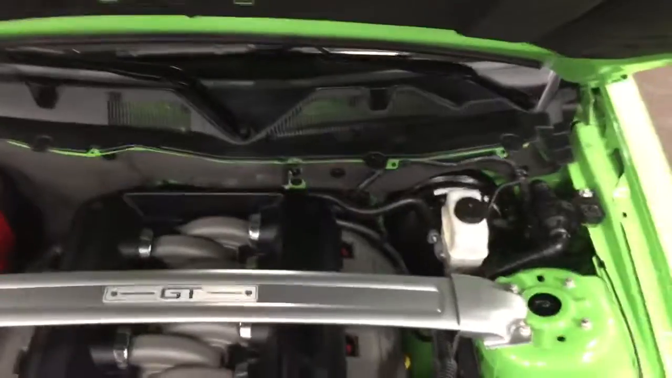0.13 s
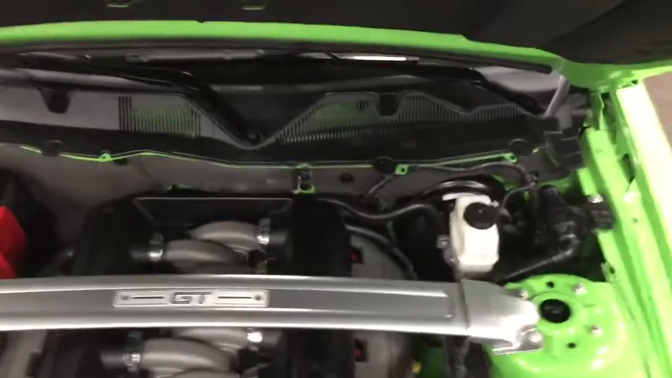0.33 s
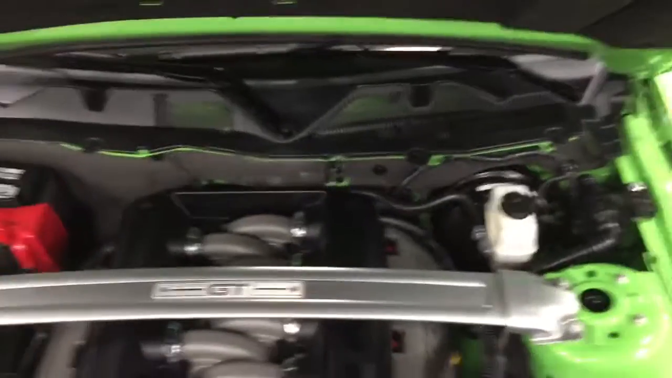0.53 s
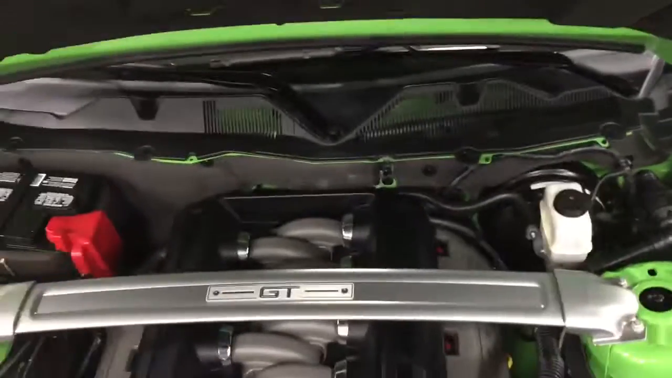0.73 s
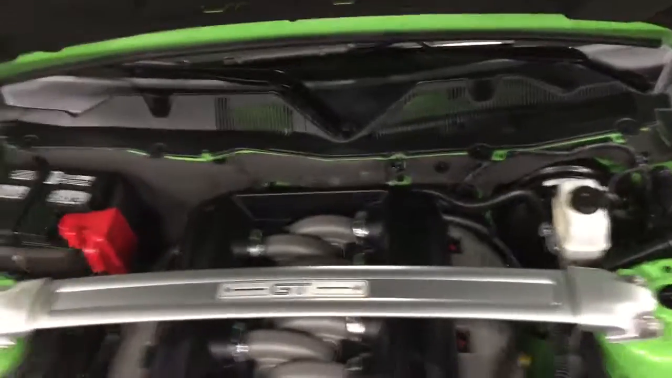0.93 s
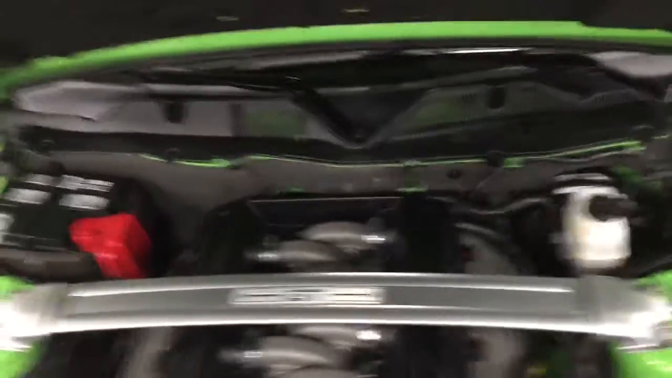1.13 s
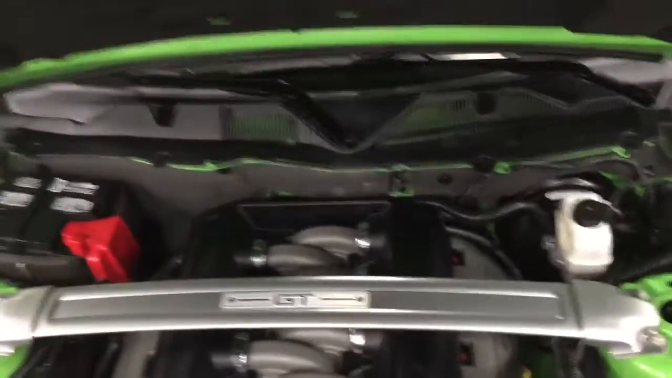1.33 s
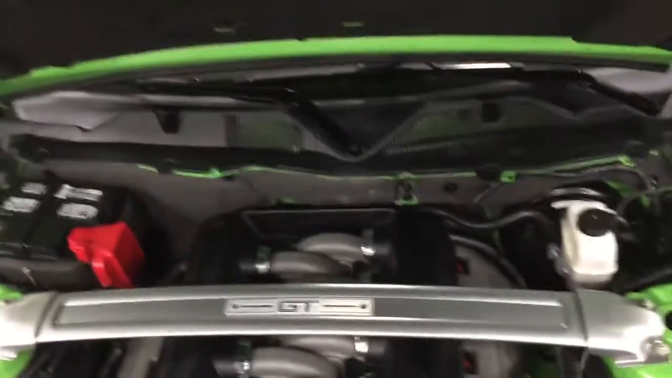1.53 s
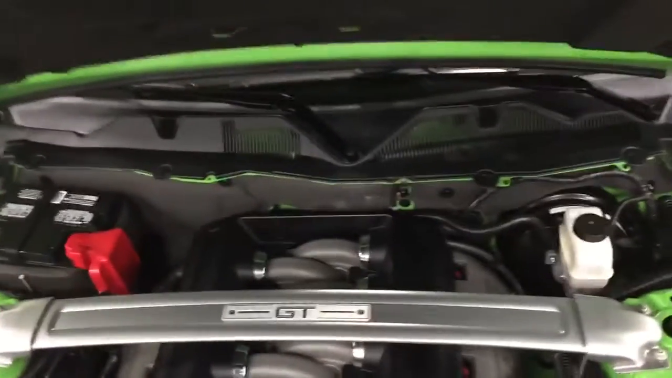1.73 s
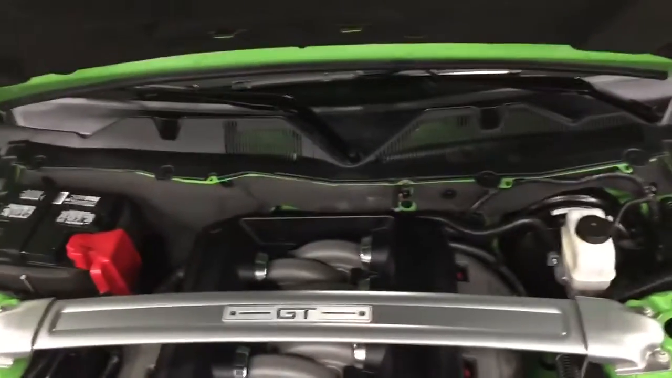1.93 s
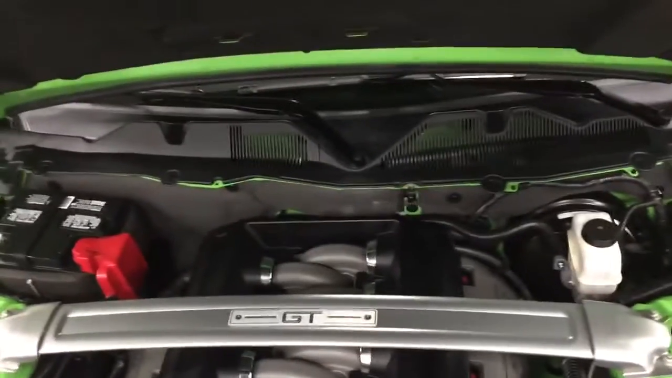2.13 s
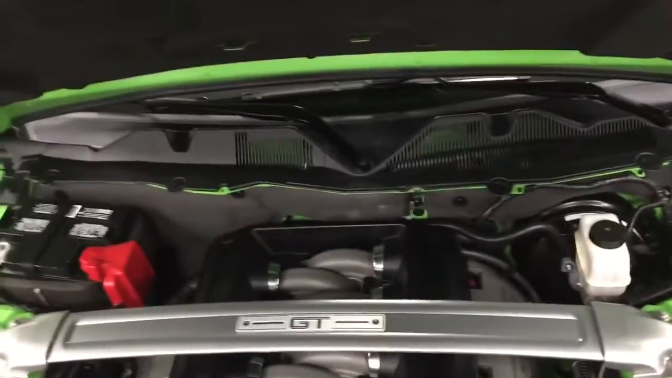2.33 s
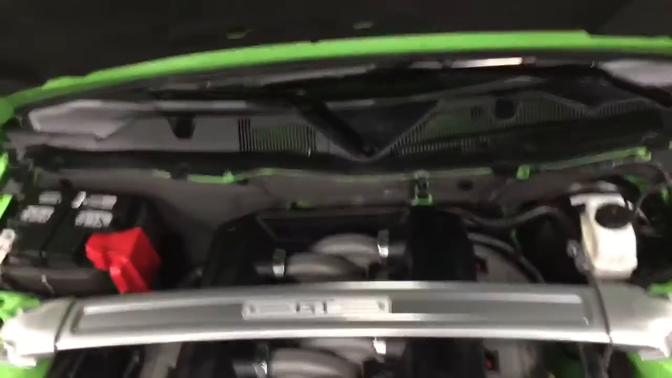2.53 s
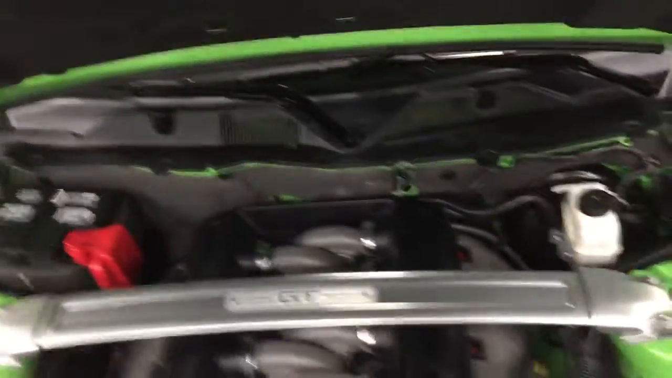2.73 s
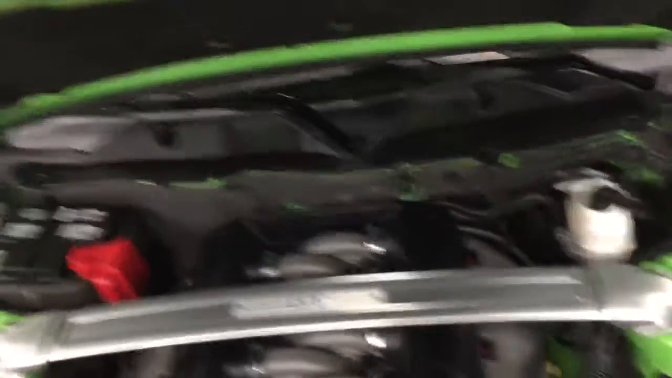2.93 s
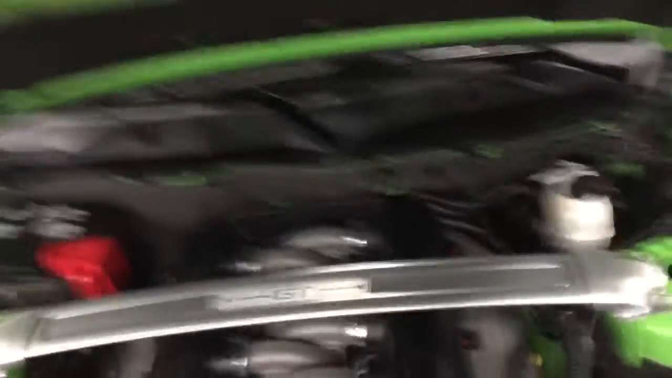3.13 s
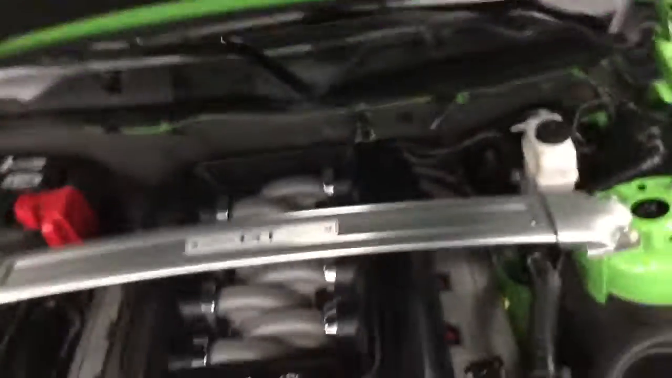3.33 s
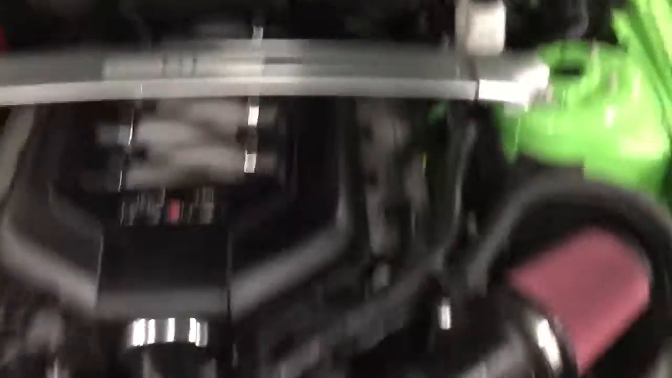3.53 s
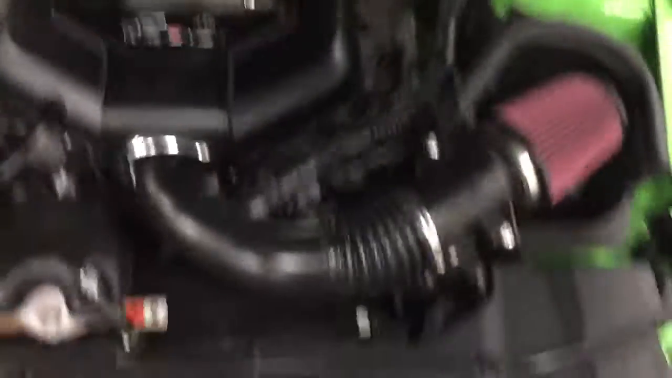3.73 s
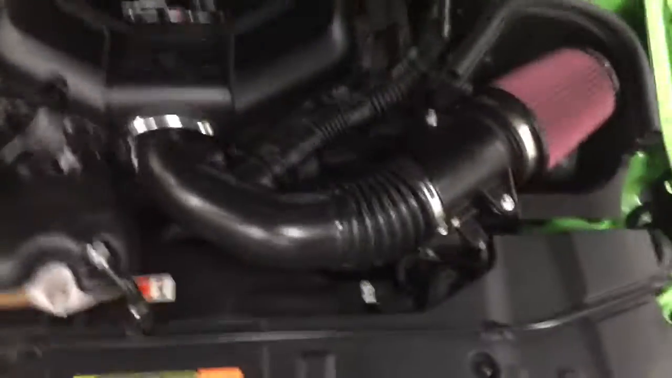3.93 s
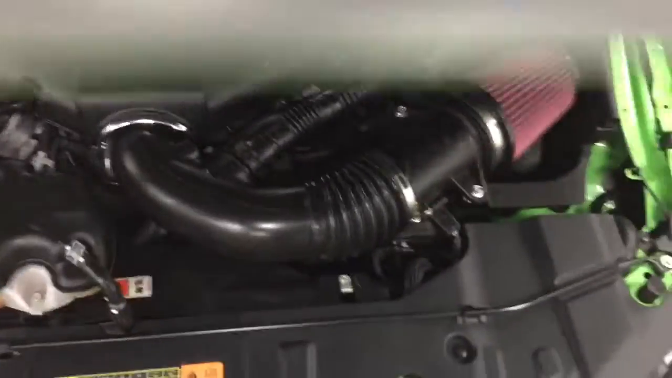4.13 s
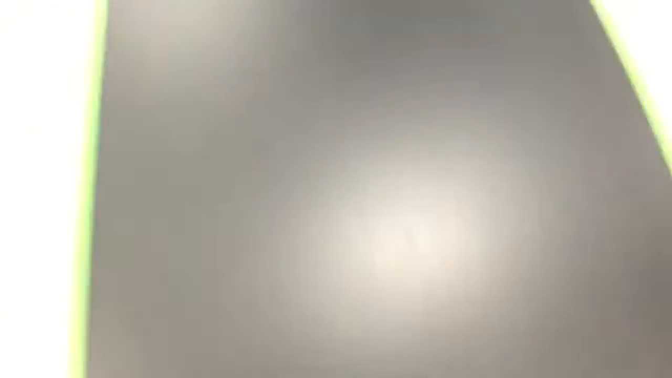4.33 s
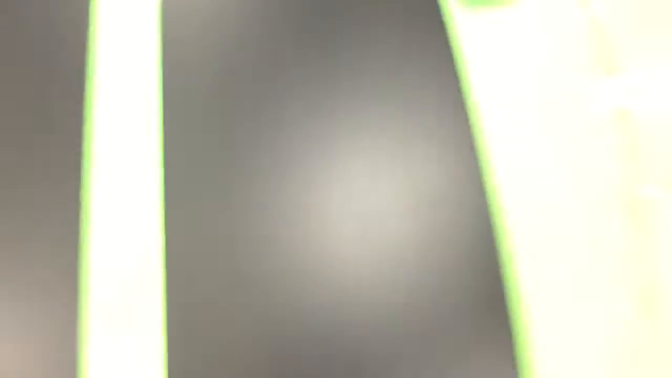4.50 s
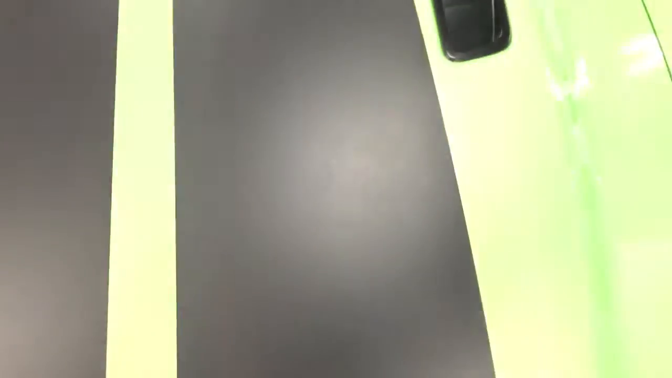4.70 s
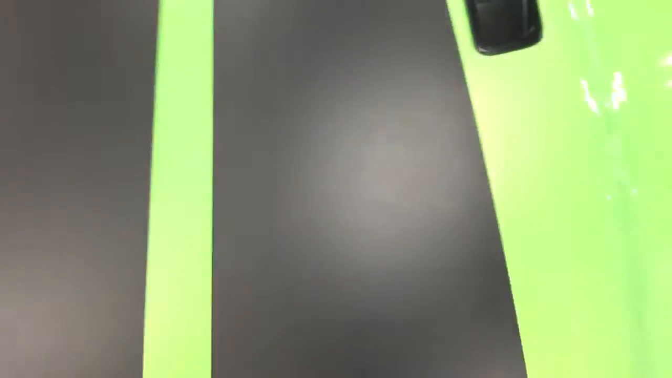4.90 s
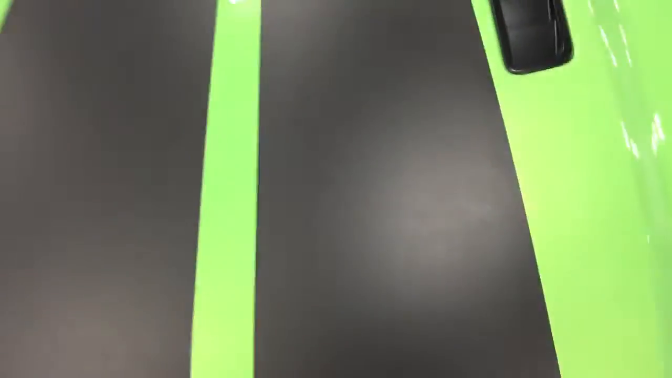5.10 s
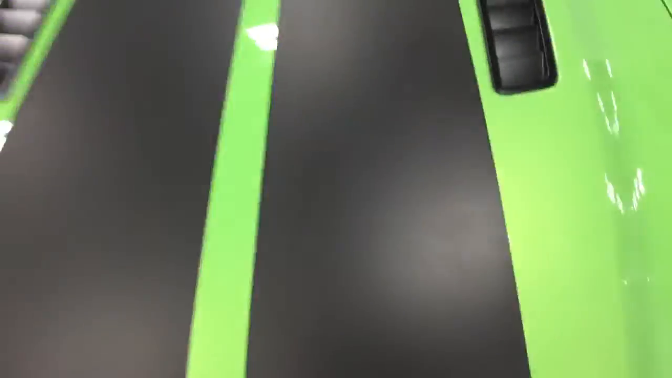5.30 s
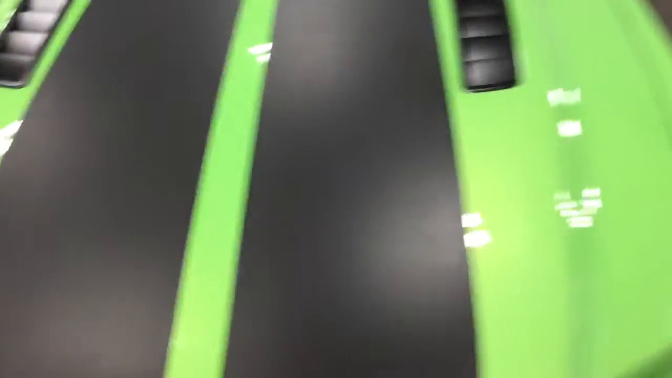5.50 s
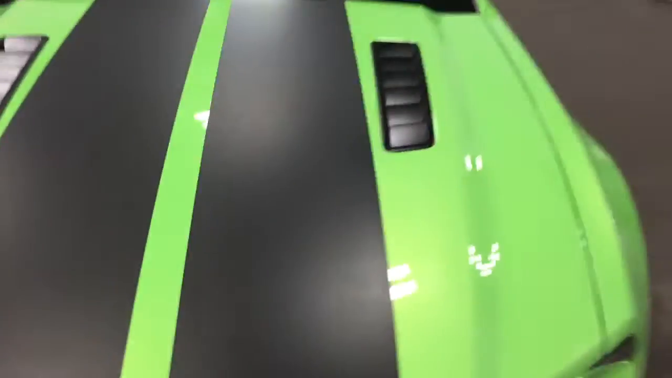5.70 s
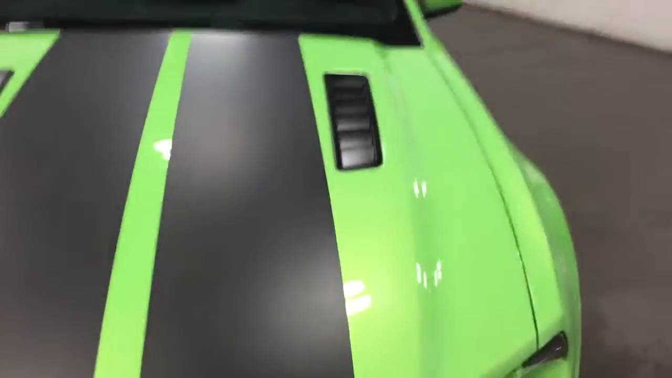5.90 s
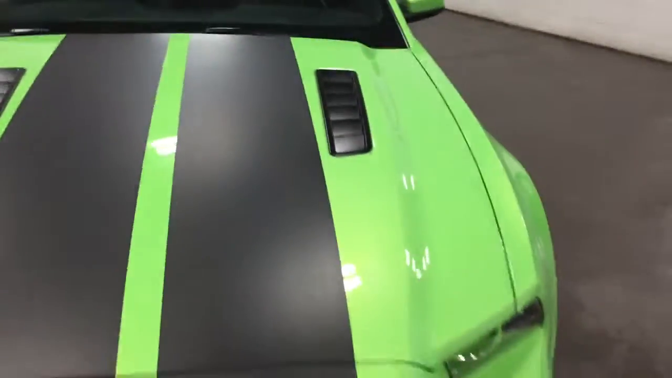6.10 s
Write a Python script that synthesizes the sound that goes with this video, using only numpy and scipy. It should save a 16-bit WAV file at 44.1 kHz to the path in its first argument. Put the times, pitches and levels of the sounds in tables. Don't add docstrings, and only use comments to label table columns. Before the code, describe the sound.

Irregular metallic clacks and small creaks under a car hood, a quieter lowering, then one heavy overloaded slam ringing briefly in a large hall.

```python
import sys
import numpy as np
from scipy import signal
from scipy.fft import rfft, irfft
from scipy.io import wavfile
from scipy.ndimage import uniform_filter1d

SR = 44100
rng = np.random.default_rng(int(sys.argv[2]) if len(sys.argv) > 2 else 0)


def master(y):
    cut = np.clip(np.atleast_2d(y).T, -1, 1)
    pcm = np.round(cut * 32767)
    wavfile.write(sys.argv[1], SR, pcm.astype(np.int16))


def volts(x):
    e = np.asarray(x, float) / 20
    return 10 ** e


N = 275757

# f/Hz, density/dB
HALL_AIR = [(18, -29.5), (30, -2.5), (230, -3.5), (437, -18), (1190, -16), (2980, -25), (14800, -37.5),
            (16000, -53.5)]
# f/Hz, width/Hz, level/dB
HUM_MODES = [(119, 5.9, -0.5), (168, 14, 2), (187, 7.8, -6), (253.3, 6.8, -3), (310, 12, -8.5),
             (325, 16, -15.5)]
# t/s, effort/dB
EFFORT = [(0, -28.5), (.23, -47), (.58, -61), (.65, -45.5), (.97, -57.5), (1.32, -50), (1.8, -40.5),
          (1.98, -53), (2.22, -33.5), (2.35, -42), (3.03, -59.5), (3.57, -46), (3.93, -50.5), (4.4, -62.5),
          (4.62, -50), (4.76, -29.5), (5.25, -65), (6.25, -66)]
# t/s, level/dB, t60/s
LURCHES = [
    (.08, -21.5, 0.13),
    (.47, -44, 0.24),
    (.66, -47, 0.56),
    (1.73, -30, 0.43),
    (2.92, -48, 0.27),
    (3.17, -44.5, 0.26),
    (4.64, -15.5, 0.65),
    (5.97, -49, 0.66),
]
# f/Hz, t60/s, level/dB
HALL_TAIL = [(200, .85, -18), (400, 0.32, -11), (710, .6, -5), (1500, 0.94, -6.5), (2800, 1.25, -4),
             (5500, 1.1, -6), (8500, 0.62, -2.5), (14000, 0.4, -4)]

# f/Hz, width/Hz, level/dB
PANEL_MODES = [(418, 20, -3.5), (577, 48, 4), (699, 140, 3), (810, 62, -2.5), (947, 240, 3.5),
               (1128, 45, 2.5), (1188, 33, -0.5), (1340, 46, -10)]
# f/Hz, width/Hz, level/dB
ROD_MODES = [(1530, 300, -2), (1730, 170, 2), (1896, 140, -0.5), (2046, 84, 3.5), (2257, 110, 1),
             (2420, 40, -4.5)]
# f/Hz, width/Hz, level/dB
BOOM_MODES = [(130, 36, 2), (186, 75, -6), (211.6, 8.3, 4), (242.6, 25, -0.5), (370, 27, -4)]

# t/s, length/s, panel level/dB, rod level/dB, fizz level/dB
CREAKS = [
    (.164, .065, -40, -41.5, -51),
    (0.618, .22, -50, -55.5, -86),
    (3.64, .038, -46, -44, -84),
    (3.756, .074, -50.5, -48, -73),
    (3.864, .037, -54.5, -59, -79),
]
# t/s, length/s, panel level/dB, rod level/dB, fizz level/dB
RUBS = [(0, .047, -36, -37.5, -46), (1.253, .19, -44, -53.5, -78), (1.357, .11, -46, -49, -76),
        (1.694, .05, -46, -52, -67), (2.083, .06, -31, -46, -68), (2.18, .079, -34.5, -44, -67),
        (2.404, .034, -34, -41.5, -53), (3.185, .055, -53.5, -60, -60), (3.265, .077, -46, -43, -61.5),
        (3.375, .11, -46, -44, -70), (3.478, .12, -56, -55.5, -73), (4.002, 0.15, -56, -62, -88.5),
        (4.411, .05, -53, -72.5, -94.5), (4.499, .11, -65, -78, -88), (4.594, .012, -44, -45.5, -58),
        (4.607, .01, -38.5, -29, -55)]
# t/s, clack level/dB, tick level/dB, f/Hz, t60/s
SNAPS = [(.1612, -27.5, -55, 3900, .14), (.252, -48, -95, 3780, 0.028), (.383, -37, -46, 7100, 0.012),
         (1.582, -40.5, -59.5, 3830, .022), (1.7084, -41, -64, 4030, 0.17), (1.7449, -9, -20.5, 4240, .036),
         (1.761, -13.5, -50.5, 2930, 0.024), (3.1712, -26.5, -36.5, 5340, .02),
         (3.2158, -31.5, -67, 4530, 0.022), (3.2372, -32.5, -51, 5270, 0.019),
         (4.6311, -7, -22.5, 5700, .05), (4.6386, -9, -19, 5300, .04), (4.6451, -6, -20.5, 5500, .025),
         (6.1486, -58.5, -59.5, 3290, .044), (6.1738, -59, -74, 3270, .045)]
# t/s, strength/dB, hardness/dB, t60/s
PANEL_KNOCKS = [(.255, -34, -40, .046), (.384, -25, -34, 0.092), (.573, -47.5, -66, 0.14),
                (.822, -35.5, -45, .12), (.933, -38, -40, 0.054), (1.022, -46, -38, 0.15),
                (1.158, -22, -22.5, 0.088), (1.251, -35, -40, 0.046), (1.268, -28, -33, 0.041),
                (1.339, -14.5, -12, 0.15), (1.346, -10.5, -5, 0.15), (1.542, -19, -8.5, .19),
                (2.141, -17.5, -7, .086), (2.174, -11.5, -8, 0.26), (2.214, -4, -5, 0.13),
                (2.412, -22, -6.5, 0.12), (2.446, -7, -10, 0.18), (2.598, -18, -14.5, .19),
                (2.93, -32.5, -40, 0.11), (3.033, -48.5, -42.5, .11), (3.112, -42, -42.5, .19),
                (3.17, -29.5, -37, .043), (4.416, -41.5, -40, .22), (5.973, -49, -40.5, 0.18),
                (6.036, -47.5, -40, .16)]
# t/s, strength/dB, hardness/dB, t60/s
SOCKET_KNOCKS = [(.011, -25, -8, 0.37), (.074, -18.5, -9.5, 0.058), (.467, -29.5, -20, 0.089),
                 (.616, -30, -47, 0.14), (.71, -52, -40, .043), (.741, -39, -40, 0.19),
                 (1.04, -32, -20.5, 0.11), (1.074, -28.5, -25.5, 0.13), (1.47, -23, -16, 0.12),
                 (1.509, -18.5, -16, 0.11), (1.584, -31, -40, 0.039), (1.71, -31.5, -35, 0.41),
                 (1.744, 3, -39.5, 0.085), (1.775, -9.5, -3.5, 0.17), (2.075, -23.5, -11.5, 0.15),
                 (2.089, -16, -3.5, 0.39), (2.247, -10, -12.5, 0.19), (2.556, -26.5, -40, .31),
                 (2.718, -36.5, -43, 0.091), (2.828, -27.5, -40, .11), (3.594, -40, -41, 0.11),
                 (4.565, -32, -5.5, 0.15)]
# t/s, strength/dB, hardness/dB, t60/s
ROD_TAPS = [(.03, -19.5, -7, 0.27), (.163, -24.5, -24, 0.42), (.654, -37, -40, 0.18),
            (3.152, -34, -11, 0.11), (3.217, -43, -40, .2), (3.254, -24, -6.5, 0.029),
            (3.392, -27, -9, 0.24), (3.447, -32.5, -7.5, 0.11), (3.561, -17, -12, .13),
            (3.619, -43, -39, 0.056), (3.641, -44, -2, 0.24), (3.756, -38.5, -40, 0.16),
            (3.834, -34, -6.5, .1), (3.858, -38.5, -40, 0.11), (3.965, -43, -43.5, 0.12),
            (4.001, -47, -40, 0.14)]
# panel/dB, rod/dB, boom/dB
PANEL_SHARE = (0, -19.5, -17.5)
SOCKET_SHARE = (0, -8.5, -16.5)
ROD_SHARE = (-3.5, 0, -18.5)

# t/s, f/Hz, level/dB, t60/s
RINGS = [(.075, 370, -16, 0.13), (.083, 197, -24, .2), (.085, 1370, -47, 0.2), (1.531, 130, -28, .4),
         (1.545, 248, -24.5, 0.19), (3.151, 456, -48, 1.6), (3.171, 5390, -37, 0.02),
         (3.216, 5070, -38, 0.046), (3.238, 5400, -42, 0.024), (3.275, 2150, -42, 0.26),
         (3.563, 560, -25.5, 0.17), (3.564, 2150, -23, .06), (4.431, 263, -53, 2.2),
         (4.699, 328, -33, 1.05), (5.972, 194, -40, .15), (5.975, 400, -51, 0.09)]
# f/Hz, level/dB, t60/s, seating t/s
SLAM_MODES = [(56.2, 6, 0.59, 4.70), (95.2, 6.5, 0.25, 4.70), (164.8, 12, 0.18, 4.665),
              (221.6, 16, .22, 4.657), (286.3, 4, .2, 4.685)]
# t/s, push level/dB, panel level/dB, rattle level/dB
SLAM_BLOWS = [
    (4.618, 2.5, -13, -1.5),
    (4.633, -8.5, -10.5, -3),
    (4.646, 4.5, -11, -5),
    (4.661, -4, -6, -10.5),
    (4.682, -13.5, -12, -19.5),
]
# f/Hz, density/dB
RATTLE = [(180, -3), (300, -0.5), (1040, -7.5), (1390, -2), (2610, -14.5), (5610, -17), (14700, -28.5),
          (16000, -44.5)]


def evened(x):
    return x / np.sqrt(np.mean(x ** 2) + 1e-20)


def headed(x):
    return x / np.sqrt(np.mean(x[:660] ** 2) + 1e-20)


def read(points, at, log=True):
    x, *columns = np.transpose(points)
    scale = np.log1p if log else np.asarray
    return [np.interp(scale(at), scale(x), column) for column in columns]


def add(mix, s, sound):
    part = mix[round(s * SR):][:len(sound)]
    part += sound[:len(part)]


def band(x, lo_hz, hi_hz, order=2):
    edges = [lo_hz, min(hi_hz, .49 * SR)]
    return signal.sosfilt(signal.butter(order, edges, "bandpass", fs=SR, output="sos"), x)


def coloured(spectrum, size):
    hz = np.fft.rfftfreq(size, 1 / SR)
    gain = volts(read(spectrum, hz)[0])
    return evened(irfft(rfft(rng.standard_normal(size)) * gain, size))


def burst(t60, size=10000):
    t = np.arange(size) / SR
    onset = np.minimum(t / 0.00065, 1)
    return rng.standard_normal(size) * volts(-60 * t / max(t60, .004)) * onset


def body(x, modes, top_hz):
    out = np.zeros(len(x))
    for hz, width, db in modes:
        shift, weight = rng.standard_normal(2)
        r = np.exp(-np.pi * width / SR)
        w = 2 * np.pi * hz * (1 + shift / 50) / SR
        ringing = signal.lfilter([1 - r, 0, r - 1], [1, -2 * r * np.cos(w), r * r], x)
        out += volts(db + 4 * weight) * ringing
    return signal.sosfilt(signal.butter(8, top_hz, fs=SR, output="sos"), out)


def background():
    t = np.arange(N) / SR
    effort_db = read(EFFORT, t, log=False)[0]
    sway = volts(.5 * effort_db - 37.5)
    for s, db, t60 in LURCHES:
        since = np.maximum(t - s, 0)
        rise = 1 - np.exp(-(since / .014) ** 2)
        sway = sway + volts(db - 60 * since / t60) * rise
    edge_s = .25
    carried = (np.tanh((t - 2.4) / edge_s) - np.tanh((t - 4) / edge_s)) / 2
    hall_air = volts(-64) * coloured(HALL_AIR, N + 1)[:N]
    hum = evened(body(rng.standard_normal(N), HUM_MODES, top_hz=450)) * volts(effort_db)
    deep = evened(band(rng.standard_normal(N), 46, 86, order=3)) * sway
    hiss = evened(band(rng.standard_normal(N), 2800, 21000)) * (volts(-88) + volts(-81.5) * carried)
    return hall_air + hum + deep + hiss


def hall(x):
    hz, t, z = signal.stft(x, SR, nperseg=512)
    power = abs(z) ** 2
    blended = uniform_filter1d(power, size=11, axis=0)
    power = np.where(hz[:, None] > 1000, blended, power)
    t60, db = read(HALL_TAIL, hz)
    t = t[t < 2]
    far_wall = 1 + .6 * np.exp(-((t - .25) / .035) ** 2)
    after_first_wall = t > .02
    tail = (volts(db[:, None] - 60 * t / t60[:, None]) * far_wall * after_first_wall) ** 2
    spread = abs(signal.fftconvolve(power, tail / tail.sum(1).mean(), axes=1)[:, :z.shape[1]])
    a, b = rng.standard_normal((z.shape[1], len(hz), 2)).T
    return signal.istft(np.sqrt(spread) * (a + 1j * b), SR, nperseg=512)[1][:N]


def scrape(length, panel_db, rod_db, fizz_db, rate):
    size = round(length * SR)
    noise = rng.standard_normal((2, 16000))
    wander = evened(uniform_filter1d(noise[0], 300))
    turns = np.cumsum(rate * np.exp(.1 * wander)) / SR
    push = rate < 250
    slips = (noise[1] + push) * (.06 + np.exp(-(turns % 1) / .06))
    slips[size:] = 0
    pressure = 1 + .3 * evened(uniform_filter1d(noise[0, ::-1], 700))[:size]
    slips[:size] *= pressure * signal.windows.tukey(size, .15) * np.linspace(1, .45, size)
    layers = [(panel_db, body(slips, PANEL_MODES, top_hz=1940)),
              (rod_db, body(slips, ROD_MODES, top_hz=2330)),
              (panel_db - 7, body(slips, BOOM_MODES, top_hz=625)),
              (fizz_db, band(slips, 3000, 14000))]
    return sum(volts(db) * layer / np.std(layer[:size]) for db, layer in layers)


def creak(length, panel_db, rod_db, fizz_db):
    slips_per_s = 150 + 3 * (panel_db + 45)
    return scrape(length, panel_db, rod_db, fizz_db, slips_per_s)


def rub(length, panel_db, rod_db, fizz_db):
    return scrape(length, panel_db, rod_db, fizz_db, 800)


def snap(clack_db, tick_db, hz, t60):
    crack = burst(0.0027) + 1.1 * burst(t60)
    clack = band(crack, .95 * hz, 1.05 * hz, order=1) + 0.22 * band(crack, 1700, 6000)
    fizz = band(burst(0.0066) + 0.29 * burst(1.5 * t60), 6500, 13500)
    return volts(clack_db - 13.5) * headed(clack) + volts(tick_db - 11) * headed(fizz)


def knock(panel_db, rod_db, boom_db, t60):
    panel = body(burst(t60) + 3.2 * burst(0.01), PANEL_MODES, top_hz=2000)
    rod = body(burst(0.57 * t60) + 1.3 * burst(0.018), ROD_MODES, top_hz=2630)
    boom = body(burst(1.1 * t60), BOOM_MODES, top_hz=598)
    out = volts(panel_db - 12.5) * headed(panel)
    out += volts(rod_db - 13.5) * headed(rod)
    return out + volts(boom_db - 2.0) * headed(boom)


def contact(share, strength_db, hardness_db, t60):
    panel_share, rod_share, boom_share = share
    boom_db = .75 * strength_db + boom_share
    clack_db = strength_db + hardness_db
    clack_hz = 2900 * np.exp(.06 * rng.standard_normal())
    thud = knock(strength_db + panel_share, strength_db + rod_share, boom_db, t60)
    return thud + snap(clack_db, 1.25 * clack_db - 12.5, clack_hz, .63 * t60)


def rings():
    out, t = np.zeros(N), np.arange(SR) / SR
    for s, hz, db, t60 in RINGS:
        wobble = 1 + .3 * evened(uniform_filter1d(rng.standard_normal(SR), 1200))
        add(out, s, wobble * volts(db - 60 * t / t60) * np.sin(2 * np.pi * hz * t))
    return out


def hood_push(s, t):
    push = np.zeros(len(t))
    for hz, db, t60, seat in SLAM_MODES:
        choke_db = -22 * (1 + np.tanh((s + t - seat) / 0.0046)) / 2
        push += volts(db - 60 * t / t60 + choke_db) * np.sin(2 * np.pi * hz * t)
    return push * (1 - np.exp(-(t / .003) ** 2))


def slam():
    out, t = np.zeros(N), np.arange(SR) / SR
    for s, push_db, panel_db, rattle_db in SLAM_BLOWS:
        panel = headed(body(burst(0.087, size=SR), PANEL_MODES, top_hz=2000))
        rattle = coloured(RATTLE, SR) * (volts(-60 * t / 0.19) + 1.5 * volts(-60 * t / 0.053))
        blow = volts(push_db) * hood_push(s, t)
        add(out, s, blow + volts(panel_db) * panel + volts(rattle_db) * rattle)
    return out


def scene():
    quiet, hood, snaps = background(), np.zeros(N), np.zeros(N)
    for s, *row in CREAKS:
        add(hood, s, creak(*row))
    for s, *row in RUBS:
        add(hood, s, rub(*row))
    for s, *row in SNAPS:
        add(snaps, s, snap(*row))
    struck = (PANEL_KNOCKS, PANEL_SHARE), (SOCKET_KNOCKS, SOCKET_SHARE), (ROD_TAPS, ROD_SHARE)
    for table, share in struck:
        for s, *row in table:
            add(hood, s, contact(share, *row))
    hood = hood + rings() + slam()
    echo = hall(hood + volts(-1) * snaps)
    return (hood + snaps + volts(-22) * echo + quiet)[None]


def roll_off(x):
    return signal.sosfilt(signal.butter(12, 16480, fs=SR, output="sos"), x)


def record(dry):
    lean = signal.sosfilt(signal.butter(2, 36, "highpass", fs=SR, output="sos"), dry)
    power_db = 10 * np.log10(abs(uniform_filter1d(lean[0] ** 2, 300)) + 1e-12)
    fall = np.arange(N) * 60. / SR
    peak_db = np.maximum.accumulate(power_db + fall) - fall
    over_db = np.maximum(peak_db + 14.5, 0)
    late_db = signal.lfilter([1 / 900], [1, 1 / 900 - 1], over_db)
    hot = lean / volts(0.45 * late_db)
    clipped = hot / (1 + abs(hot / .7) ** 8) ** (1 / 8)
    clipped = signal.sosfilt(signal.butter(1, 6, "highpass", fs=SR, output="sos"), clipped)
    treble_limit = signal.firwin(63, 15600, fs=SR)[None]
    return roll_off(signal.oaconvolve(clipped, treble_limit, "same"))


dry = scene()
out = record(dry)
master(out)
```